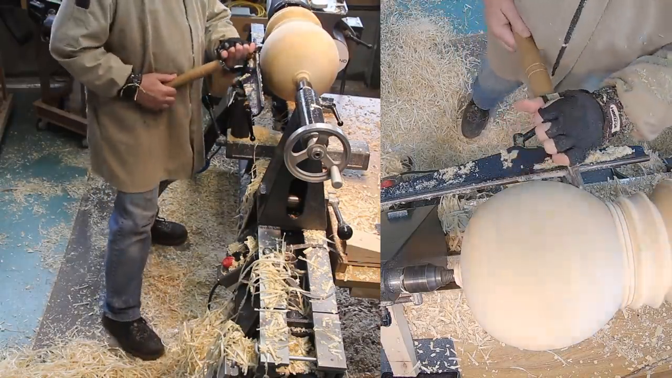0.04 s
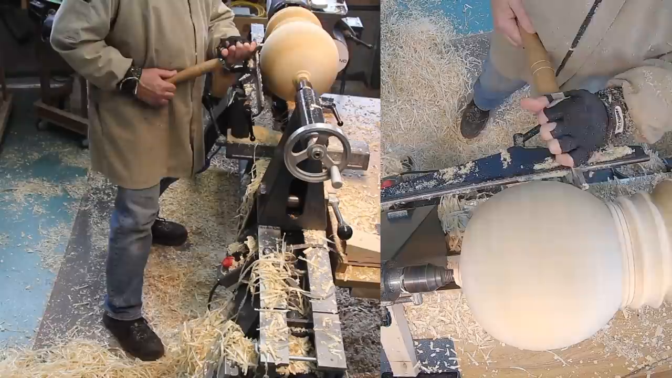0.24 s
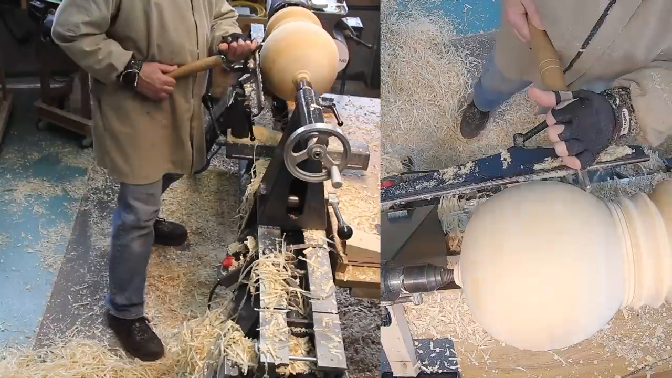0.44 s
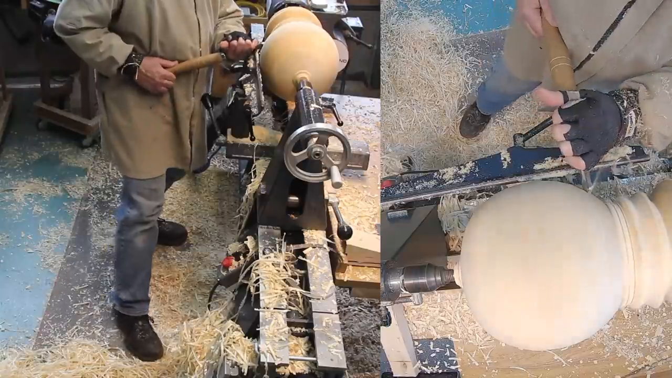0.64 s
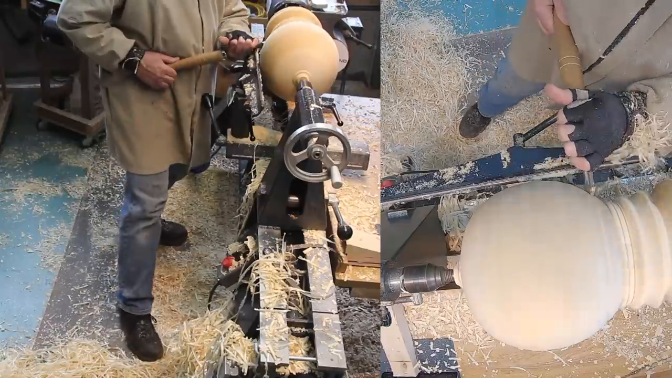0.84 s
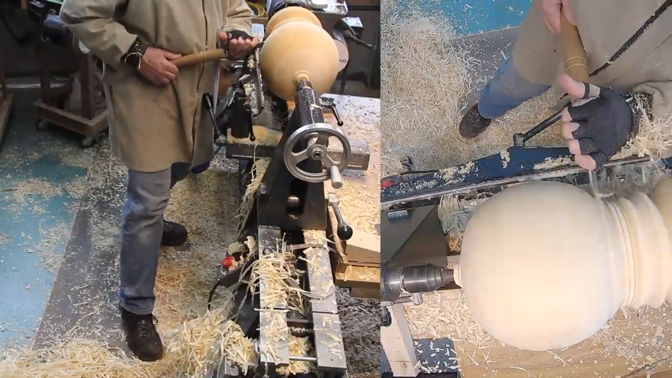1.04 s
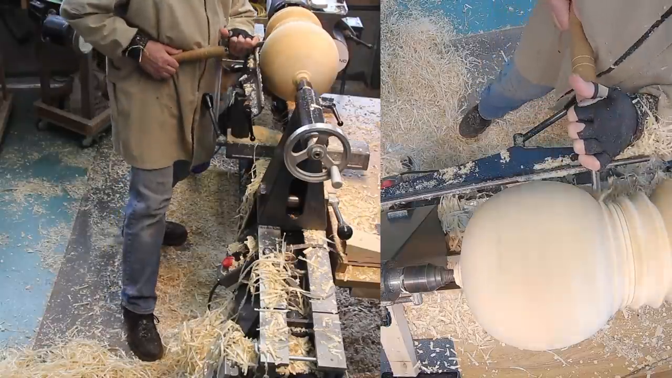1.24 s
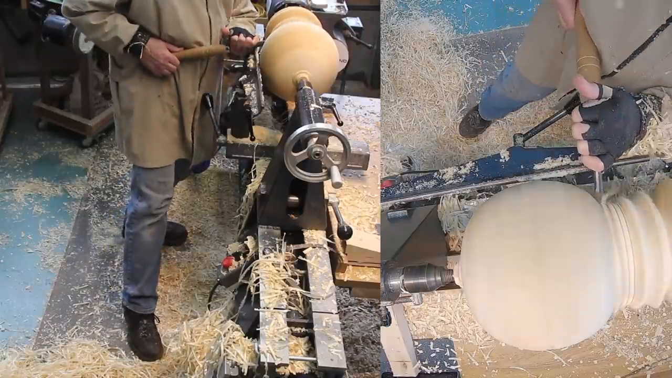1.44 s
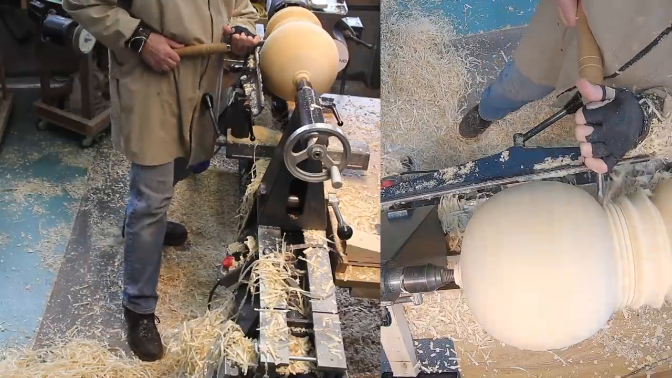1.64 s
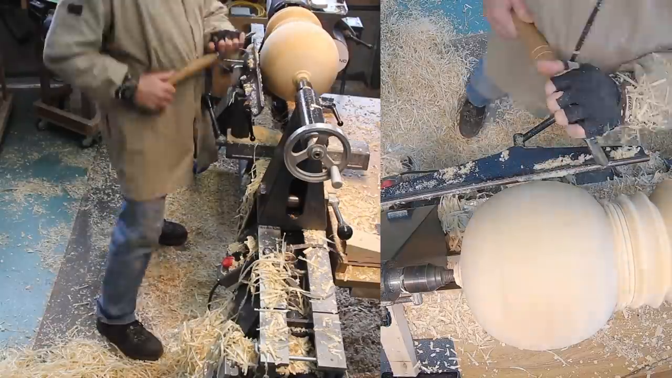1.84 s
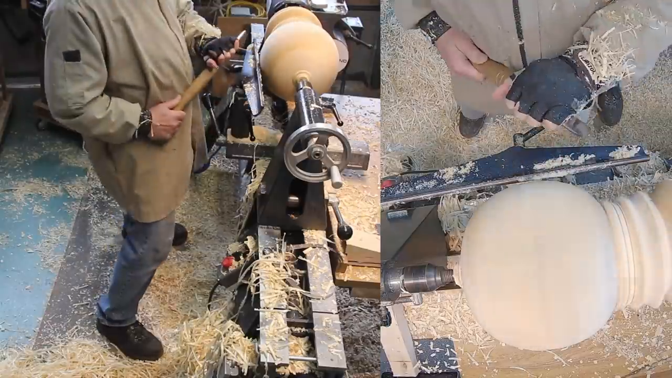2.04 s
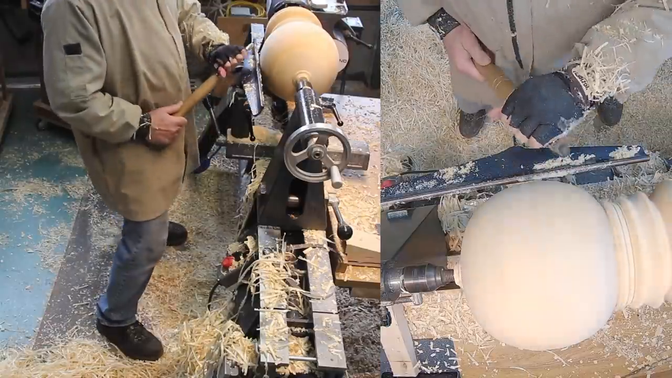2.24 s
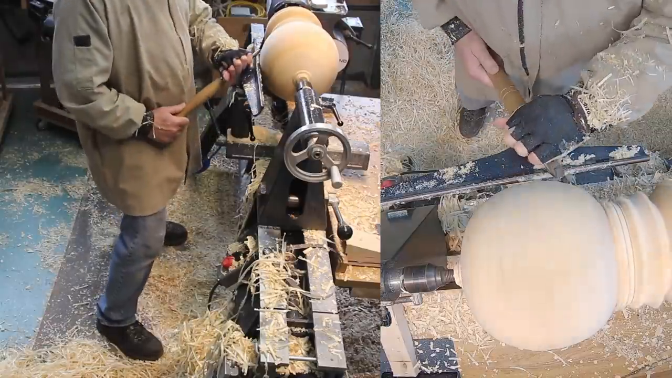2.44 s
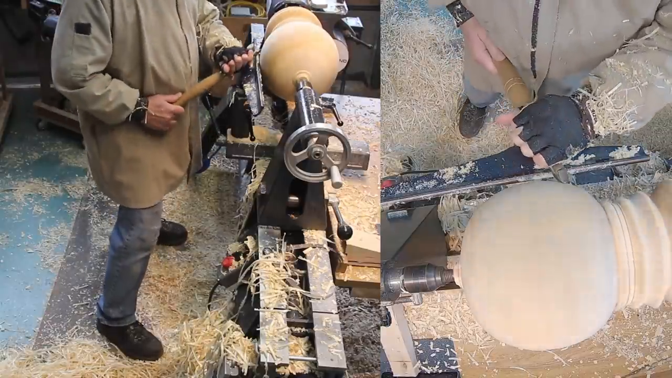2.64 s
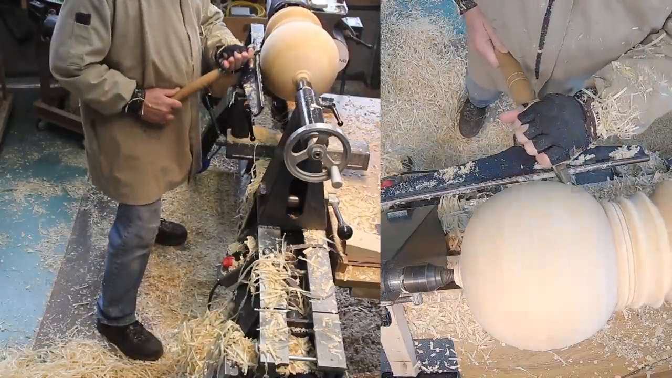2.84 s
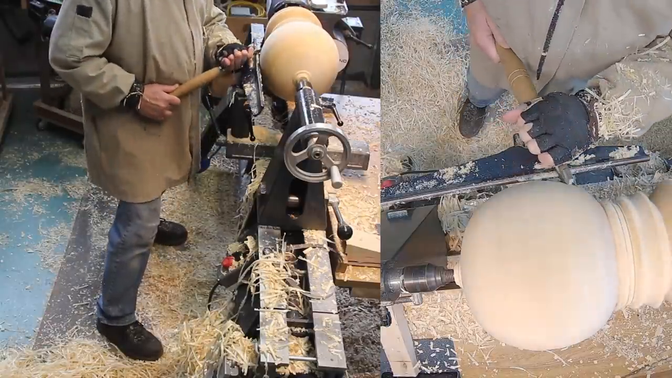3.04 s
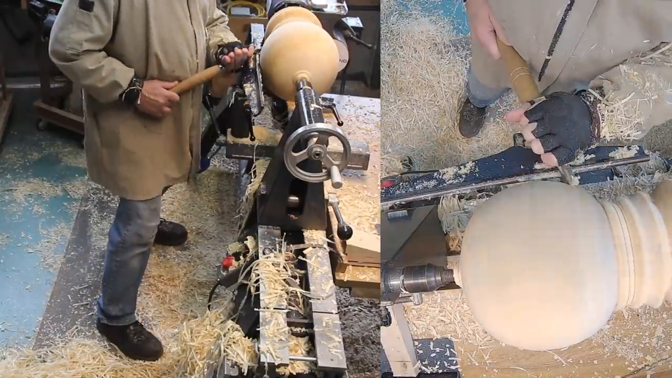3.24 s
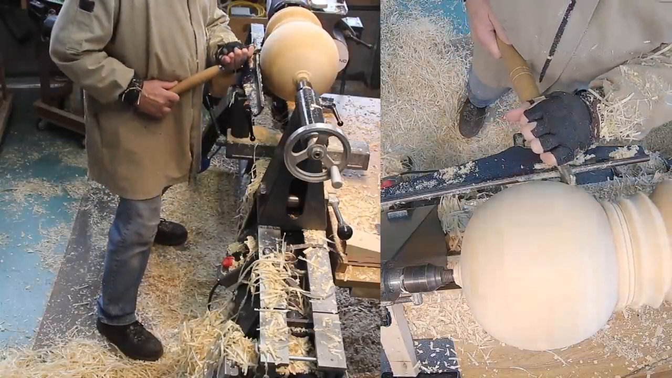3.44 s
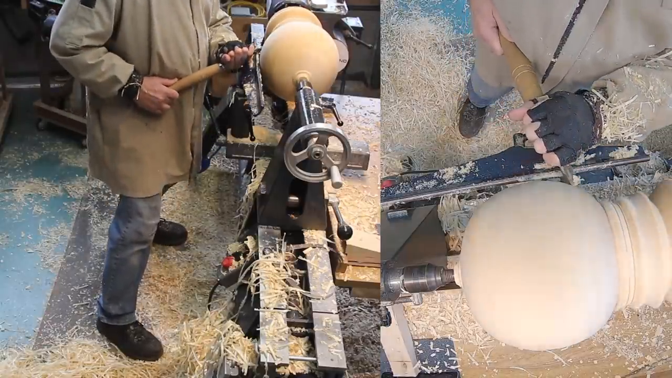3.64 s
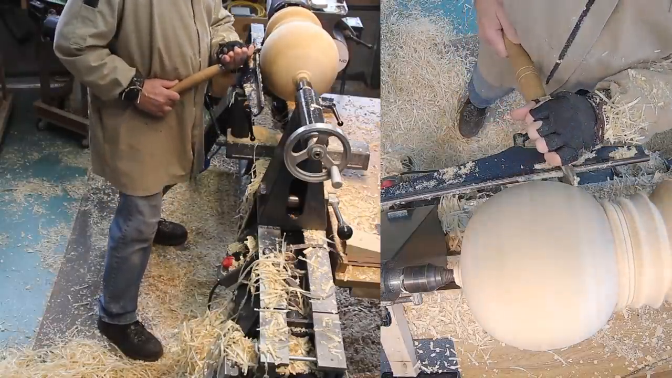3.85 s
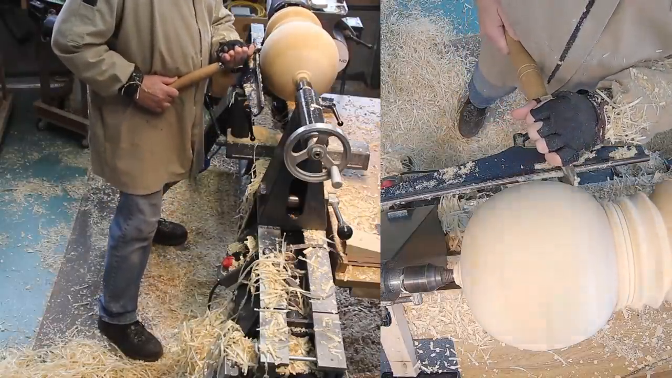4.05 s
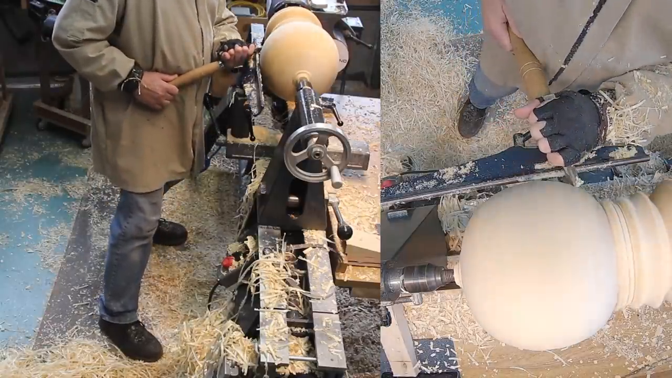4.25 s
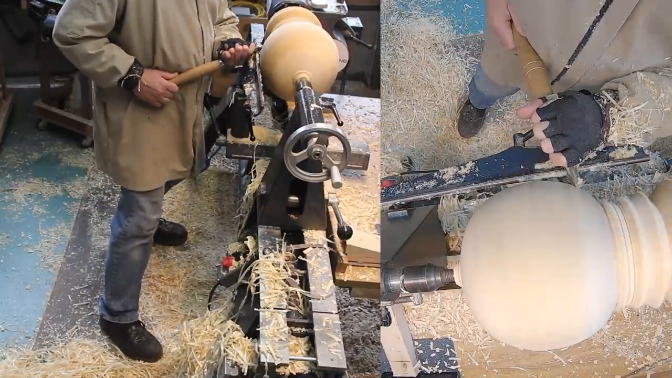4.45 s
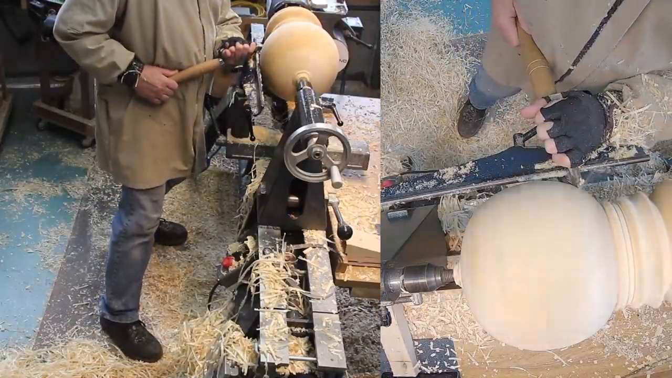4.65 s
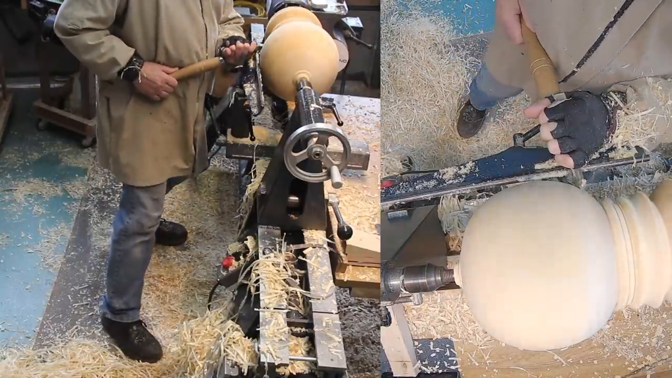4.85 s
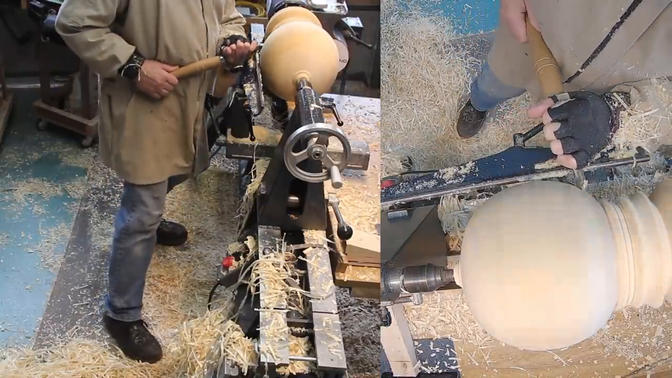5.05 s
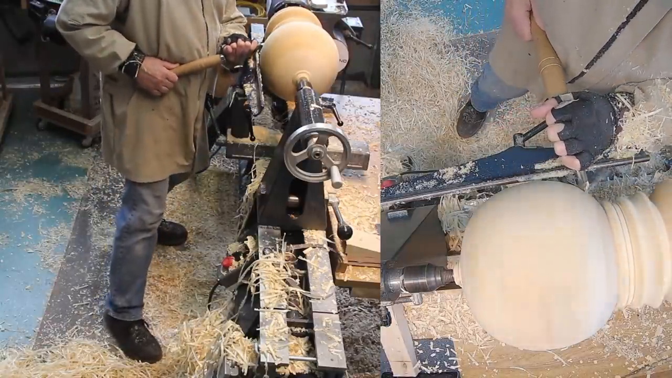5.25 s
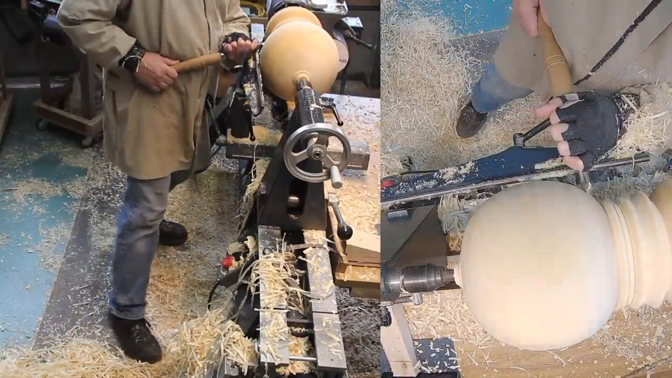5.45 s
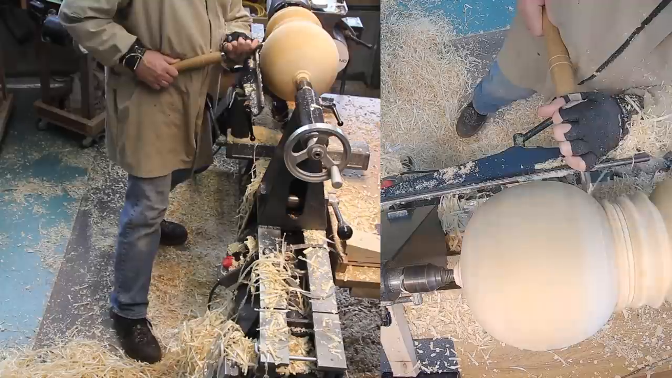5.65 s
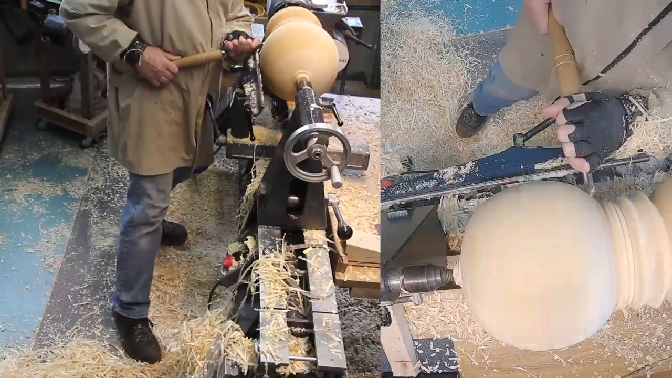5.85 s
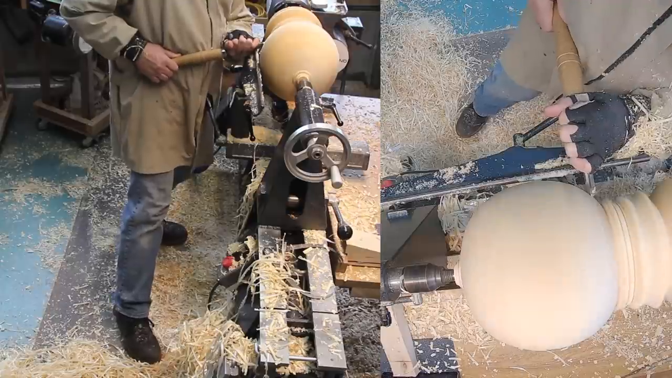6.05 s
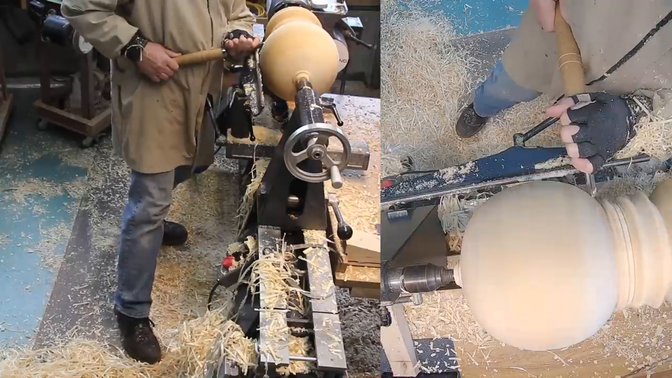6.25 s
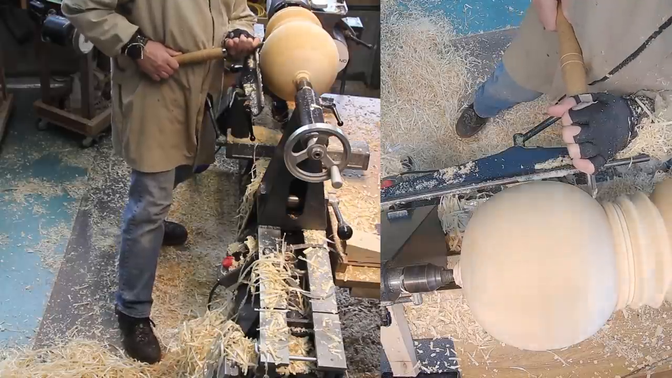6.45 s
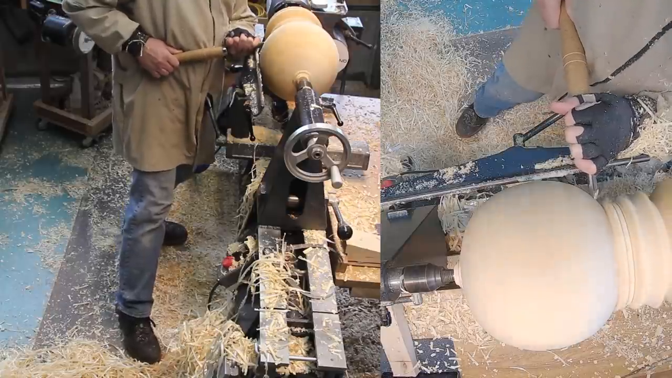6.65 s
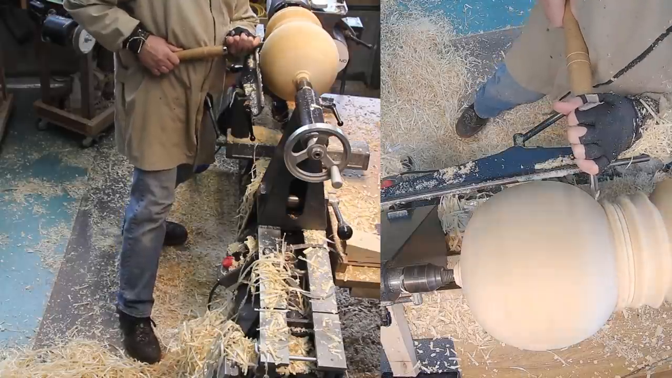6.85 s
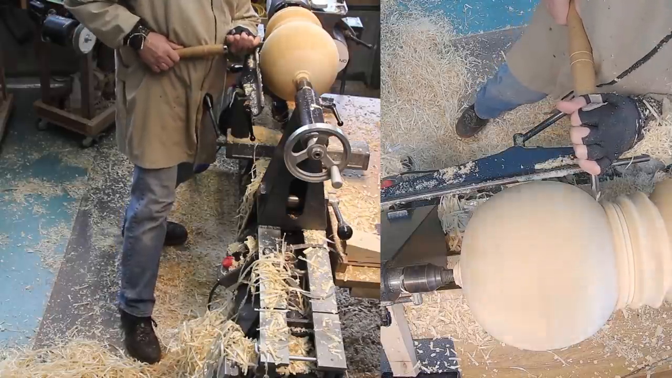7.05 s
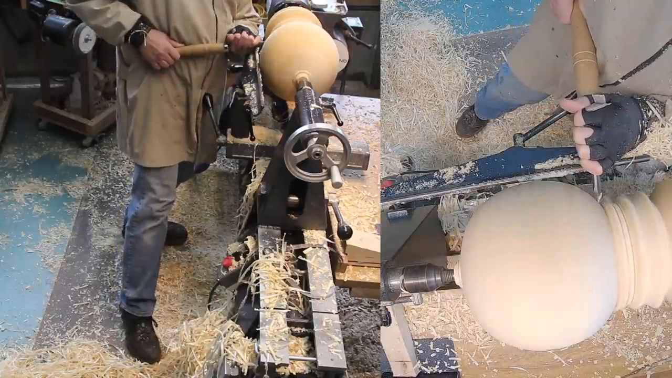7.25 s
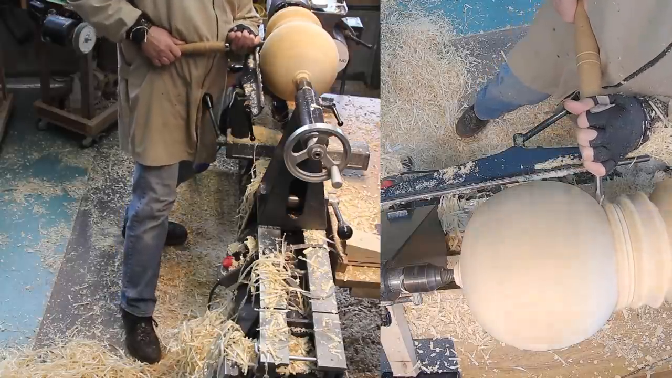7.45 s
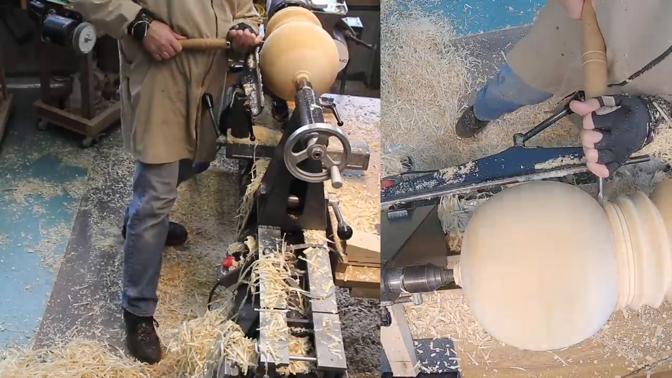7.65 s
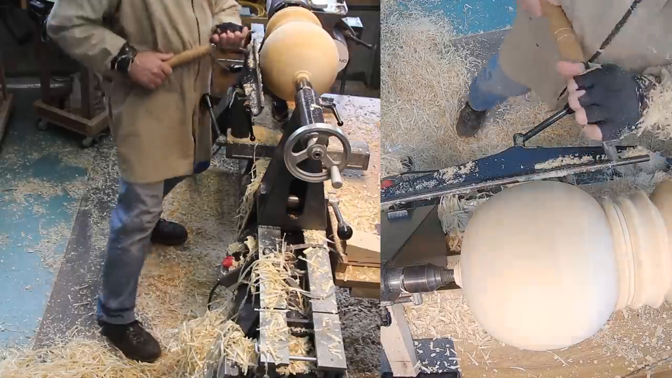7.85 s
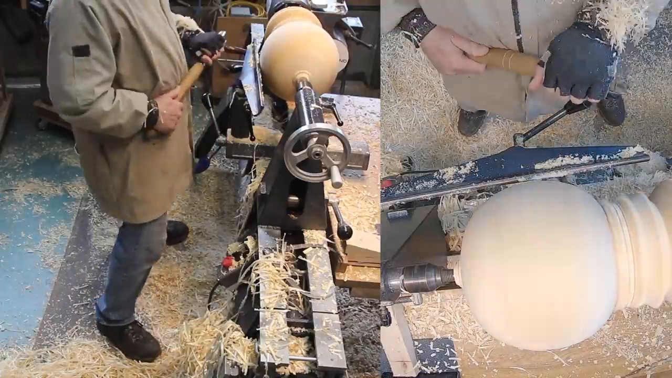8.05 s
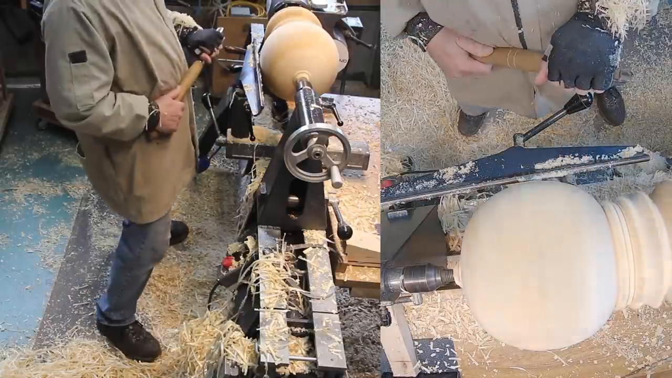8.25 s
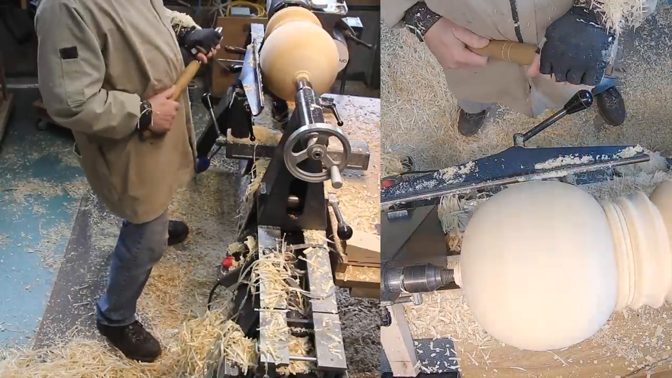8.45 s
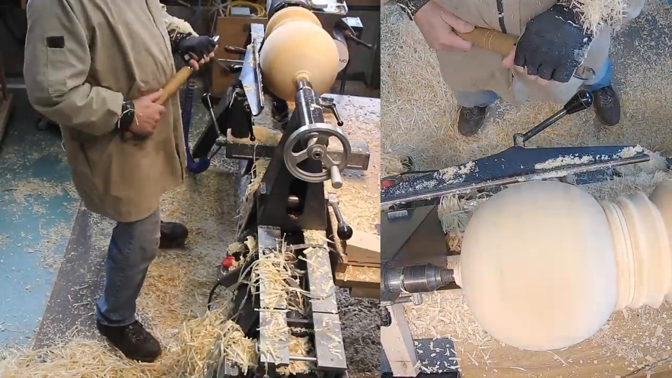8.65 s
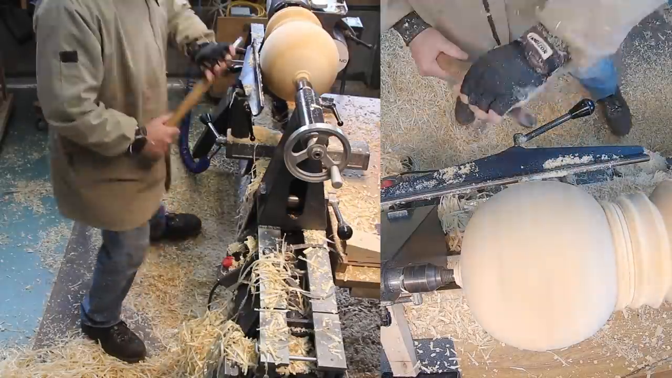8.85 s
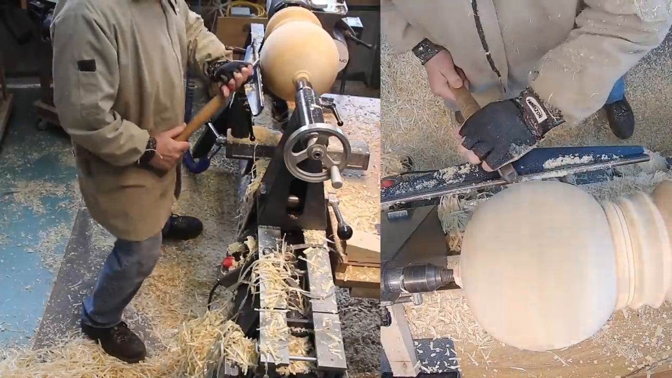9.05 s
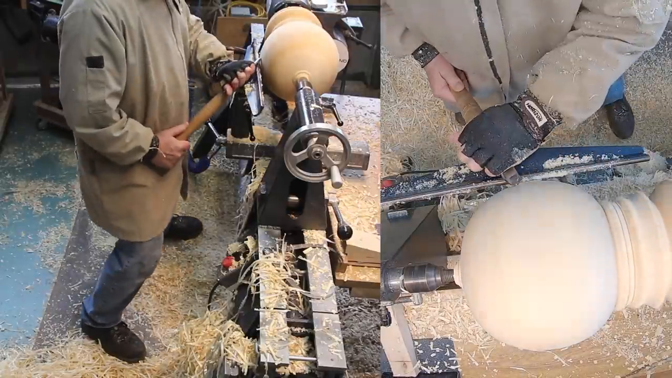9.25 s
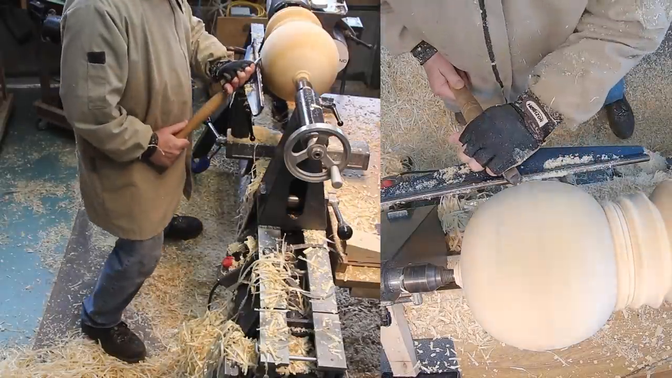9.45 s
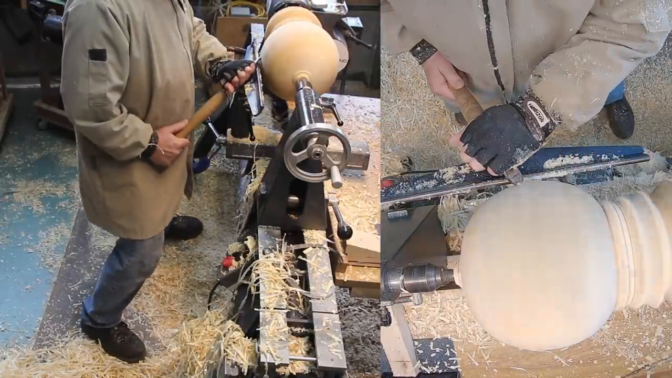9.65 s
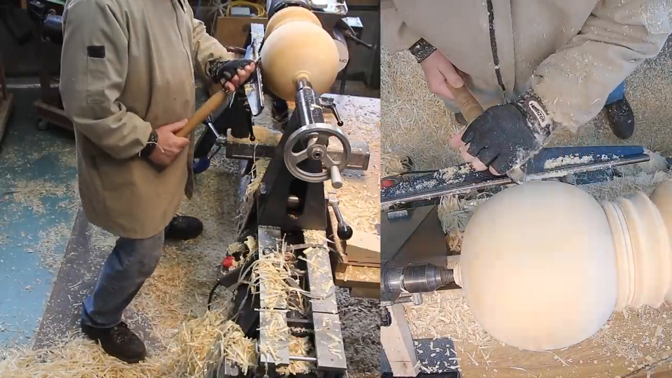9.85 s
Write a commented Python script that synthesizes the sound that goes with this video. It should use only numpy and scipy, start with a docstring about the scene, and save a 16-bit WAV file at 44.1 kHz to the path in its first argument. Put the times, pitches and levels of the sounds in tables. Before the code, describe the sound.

Close to a lathe in a workshop, a gouge tears at spinning wood with a grainy, hissing scrape and a metallic ring, while the machine rumbles at first. After a short pause of quiet whirring, more strokes follow, easing and biting with a few brief squeals. The cutting stops again, the faint idle drops out for an instant, and a sharp, stuttering click and a tiny tick lead into one final pass.

```python
"""A gouge cuts green wood spinning on a workshop lathe, while a low, gusty rumble dies away at first. Tearing
fibres ring the steel tool, its rest and the wood in light and deep strokes that judder, ease and bite. The
lathe idles in a pause; then more strokes follow, some throbbing or squealing. In a second pause the drive
pulses faintly and all sound drops out briefly. The tool clicks on the rest, ticks the wood and makes a last
pass. The click and part of the noise stutter sixty times a second."""
import sys
import numpy as np
from scipy import signal
from scipy.fft import rfft, irfft, next_fast_len
from scipy.io import wavfile
from scipy.ndimage import uniform_filter1d

SR = 44100
rng = np.random.default_rng(int(sys.argv[2]) if len(sys.argv) > 2 else 0)


def wav_out(sig):
    """Save sig, one row per channel (or a flat mono array), as 16-bit PCM at SR to the path in sys.argv[1]."""
    wavfile.write(sys.argv[1], SR, np.round(np.clip(np.atleast_2d(sig).T, -1, 1) * 32767).astype(np.int16))


N = 437031

def gain_of(db):
    """Turn decibels into a number to multiply by."""
    return 10 ** (np.asarray(db) / 20)

def evened(x):
    """Scale a signal to an average strength (RMS) of 1."""
    return x / np.sqrt(np.mean(x ** 2) + 1e-20)

def level_at(points, hz):
    """Read levels between rows of frequency and level."""
    f, db = np.transpose(points)
    return np.interp(np.log(hz + 1), np.log(f + 1), db)

def curve(rows):
    """Join rows of time and value with straight lines."""
    return np.interp(np.arange(N) / SR, *np.transpose(rows))

def add(mix, start, sound):
    """Mix a sound in at a start time in seconds."""
    part = mix[..., round(start * SR):][..., :sound.shape[-1]]
    part += sound[..., :part.shape[-1]]

def hump(t, middle, width):
    """A smooth bump of height 1."""
    return np.exp(-(2 * (t - middle) / width) ** 2)

def wander(n, per_s):
    """A random drift of about 1 either way; a higher per_s moves faster."""
    knots = rng.standard_normal(int(n / SR * 40) + 3)
    smooth = evened(signal.lfilter([1], [1, -np.exp(-per_s / 40)], knots))
    return np.interp(np.arange(n) / SR * 40, np.arange(len(knots)), smooth)

def stuttered(x, repeats_db, every_s=.0166):
    """Play every moment several times in quick succession, once at each level."""
    taps = np.zeros(round(len(repeats_db) * every_s * SR))
    taps[np.round(np.arange(len(repeats_db)) * every_s * SR).astype(int)] = gain_of(repeats_db)
    return signal.oaconvolve(x, taps[None], axes=1)[:, :x.shape[1]]

def grainy_noise(n, spread_db, stutter_share):
    """Uneven, partly stuttering noise in two rows: mid (what left and right share) and side (the rest)."""
    grain = gain_of(spread_db * uniform_filter1d(rng.standard_normal((2, n)), 100) * 10)
    repeating, plain = rng.standard_normal((2, 2, n)) * grain[:, None]
    repeating = stuttered(repeating, repeats_db=[0.5, -5.5, -8.5, -5.5])
    return np.sqrt(stutter_share) * evened(repeating) + np.sqrt(1 - stutter_share) * evened(plain)

def hiss(spectrum, flicker_db, size=N):
    """Flickering noise with the given tone colour."""
    n = next_fast_len(size)
    colour = gain_of(level_at(spectrum, np.fft.rfftfreq(n, 1 / SR)))
    noise = irfft(rfft(grainy_noise(n, spread_db=0.94, stutter_share=0.2)) * colour, n)[:, :size]
    return evened(noise) * gain_of(flicker_db * wander(size, 30))

# The idling lathe, farther off and nearer. Each row: frequency in Hz, relative level in dB.
IDLE_COLOUR = [(60, -70), (130, -13.5), (250, -8.5), (530, -8), (1000, -10), (1300, -14.5), (2600, -22),
               (3400, -23.5), (4500, -32), (10300, -38.5), (11500, -84)]
NEAR_COLOUR = [(88, -47), (150, -23), (349, -8.5), (518, -2), (1010, -5), (1470, -21.5), (2180, -7),
               (2910, -25), (3480, -15.5), (9030, -34), (11000, -44), (14300, -100)]
# How loud the farther sound is. Each row: time in seconds, level in dB.
IDLE_LEVELS = [(0, -50.5), (2, -64.5), (2.7, -68.5), (6, -66.5), (8, -69), (8.9, -72.5), (9.91, -81)]
GAP_START_S, GAP_END_S = 8.855, 8.884  # the dropout

def idling_lathe():
    """The lathe whirs as it runs free, and sounds nearer after the dropout."""
    out = hiss(IDLE_COLOUR, flicker_db=1) * gain_of(curve(IDLE_LEVELS)) * [[1], [.5]]
    near = hiss(NEAR_COLOUR, flicker_db=0.77, size=SR + 4000)
    add(out, GAP_START_S, near * gain_of(-51) * [[1], [.4]])
    return out

# A low, gusty rumble. Each row: frequency in Hz, relative level in dB.
RUMBLE_COLOUR = [(30, -49), (90, -5), (124, -0.5), (183, -7), (230, 1.5), (295, -10.5), (520, -9),
                 (880, -120)]
# How it dies away. Each row: time in seconds, level in dB.
RUMBLE_LEVELS = [(0.0, -47), (.73, -46.5), (1.5, -54), (1.9, -54), (2.2, -60.5), (2.65, -67), (2.88, -58.5),
                 (3.1, -100)]

def low_rumble(size=N // 3):
    """A low, gusty rumble dies away over the first three seconds."""
    rumble = hiss(RUMBLE_COLOUR, flicker_db=4.5, size=size)
    return rumble * gain_of(curve(RUMBLE_LEVELS)[:size]) * [[1], [.15]]

# The cut has six bands, low to high: wood thrum, rest judder, growl, tool ring, hiss and fizz.
# Strokes of the gouge. Each row: start, end and rise time in seconds, ring level going in and coming
# out in dB, deepening in dB, then thrum, judder, growl, hiss and fizz in dB compared with the ring.
STROKES = [(-.05, 0.915, 0.14, -39, -40, 5.5, -14.5, -27, -4.5, -6.5, -15.5),
           (0.858, 1.812, 0.17, -35.5, -35.5, 16, -8.5, -6, 0, -6.5, -9.5),
           (2.777, 3.334, 0.23, -43, -39.5, 14.5, -35, -23, -9.5, -1.5, -7),
           (3.378, 3.793, 0.17, -36, -39, 10, -36, -15, -7, -5, -15),
           (3.94, 4.874, 0.13, -39, -41.5, 22, -34, -18, -6, -5.5, -13.5),
           (4.88, 5.803, 0.12, -38.5, -44, -8.5, -24, -19, -2.5, -12.5, -25),
           (5.815, 6.422, 0.087, -40, -50.5, 3, -25, -18, -6.5, -15.5, -24),
           (6.425, 6.704, 0.1, -54, -61.5, -2, -19, -8.5, -4.5, -10, -16.5),
           (6.704, 7.15, 0.019, -52, -56.5, -4.5, -20, -12.5, 1.5, -11.5, -21),
           (7.145, 7.636, 0.3, -45.5, -59.5, 3.5, -11.5, -10, -5.5, -13.5, -12.5),
           (7.638, 7.794, 0.16, -38.5, -38, 7.5, -1, -17, -1.5, -8, -9.5),
           (9.312, 10.006, 0.076, -40.5, -33.5, -6, -9.5, -7, -4, -7.5, -12)]
# The share of the deepening that each band gets, low to high.
DEEPENING_SHARES = [1.3, 0.64, 0.57, 0.039, -0.37, -0.46]

def stroke(t, start, end, rise, in_db, out_db, deepening_db, *bands_db):
    """Six band strengths as the edge slides in, cuts and lifts off. Deeper means more lows, less fizz."""
    along = np.clip((t - start) / (end - start), 0, 1)
    lift_db = -48.5 * (np.maximum(t - end, 0) / 0.12) ** 0.96
    ring = np.clip((t - start) / rise, 0, 1) * gain_of(in_db + (out_db - in_db) * along + lift_db)
    balance_db = np.array([*bands_db[:3], 0, *bands_db[3:]])[:, None]
    depth_db = deepening_db * (along ** 0.4 - .5)  # most of the change comes early
    return ring * gain_of(balance_db + np.outer(DEEPENING_SHARES, depth_db))

# How wide the cut sounds. Each row: frequency in Hz, side level compared with mid in dB.
STEREO_WIDTH = [(60, -20), (150, 6.5), (380, -20), (950, -5.5), (2380, -11), (5980, -12), (9000, 0.5),
                (15000, -3.5)]

def tearing_fibres(n, hz, uneven):
    """The spectrum of many tiny tears in the wood; in the treble, side partly follows mid."""
    mid, side = rfft(grainy_noise(n, spread_db=2.02 * uneven, stutter_share=0.64))
    alike = 0.4 * np.clip(hz / 8000, 0, 1)
    side = alike * np.exp(0.44j) * mid + np.sqrt(1 - alike ** 2) * side
    return np.array([mid, side * gain_of(level_at(STEREO_WIDTH, hz))])

def ringing(tears, n, hz, rolling, pitch_hz, width_hz, db):
    """The tears keep one note ringing. It swells and fades, and drifts in pitch if the edge rolls."""
    loose = (pitch_hz / 8000) ** 2  # high rings are damped more and swell more
    width_hz += 0.0045 * pitch_hz * (1 + (6.4 + 8 * rolling) * loose)
    spectrum = tears / (1 + 2j * (hz - pitch_hz) / width_hz) ** 2
    if rolling:
        drift_hz = .02 * pitch_hz * rolling * wander(n, 6)
        ring = 2 * (np.fft.ifft(spectrum, n) * np.exp(2j * np.pi * np.cumsum(drift_hz) / SR)).real
    else:
        ring = irfft(spectrum, n)
    quick_db = .6 * wander(n, 30)
    slow_db = (loose + 3.5 * rolling / (1 + loose)) * wander(n, 16)
    return ring * gain_of(db + quick_db + slow_db - 1.5 * loose)

# The borders between the six bands, in Hz.
BAND_BORDERS_HZ = [900, 1300, 2300, 5000, 8500]

def cut(gains, colour, rolling, uneven):
    """Tearing fibres make a scrape and set notes ringing; each band follows its own row of gains."""
    rings, scrape = colour
    size = gains.shape[1]
    n = next_fast_len(size)
    hz = np.fft.rfftfreq(n, 1 / SR)
    tears = tearing_fibres(n, hz, uneven)
    band_of = np.digitize(hz * (1 + 0.13 * rng.standard_normal(len(hz))), BAND_BORDERS_HZ)  # soft edges
    scraping = tears * gain_of(level_at(scrape, hz) - 7)
    bands = np.array([irfft(scraping * (band_of == k), n) for k in range(6)])
    for row in rings:
        bands[np.digitize(row[0], BAND_BORDERS_HZ)] += ringing(tears, n, hz, rolling, *row)
    out = 0
    for band, gain in zip(bands[..., :size], gains):
        steady = band / np.sqrt(uniform_filter1d(band[0] ** 2, 6000) + 1e-12)
        out += steady * gain * gain_of(1.5 * uneven * wander(size, 72))  # the grain catches unevenly
    return out

# Six tone colours of the cut, with two lists each. First the rings. Each row: pitch in Hz, width in Hz,
# relative level in dB. Then the scrape between them. Each row: frequency in Hz, relative level in dB.
LIGHT = ([(1089, 131, 10), (1444, 57, -12.5), (1748, 220, -7.5), (1937, 170, -9.5), (2192, 100, -11.5),
          (2776, 250, 1.5), (3302, 360, 6), (4246, 240, -1), (5614, 100, -11.5), (7040, 1300, -17.5)],
          [(180, -72.5), (300, -13.5), (1080, -4), (2400, -1.5), (3330, 9), (12300, -27.5), (15000, -47)])
DEEP = ([(426, 29, -4), (755, 150, -3.5), (1113, 146, -6), (1417, 320, -7.5), (1762, 300, -6.5),
         (2916, 91, -10.5), (3330, 88, -12.5), (7440, 280, -30)], [(150, -45.5), (250, -10), (411, 10.5),
         (641, 2.5), (3270, -1.5), (8520, -25), (15000, -59)])
SKIM = ([(1109, 61, 16), (1820, 98, 2.5), (2742, 240, 5), (3255, 170, 6), (4650, 170, -14)], [(180, -72),
         (300, -3.5), (3270, -3.5), (3980, -20.5), (9490, -66.5), (15000, -92)])
ROLLED = ([(446, 160, 13.5), (1955, 220, 4.5), (2880, 220, 4.5), (3980, 250, -0.5), (4740, 180, -1),
           (6600, 690, 0.5), (9480, 120, 5)], [(180, -24.5), (300, 2.5), (2820, 5), (8320, -18),
           (9640, -16), (15000, -61.5)])
CATCH = ([(411, 57, -7.5), (1360, 270, -6), (1866, 130, 3), (2880, 150, 11)], [(120, -87.5), (200, -31),
          (440, -4), (720, -18), (2850, 10.5), (9500, -28.5), (15000, -72)])
LAST = ([(524, 39, 3.5), (1090, 160, -9.5), (2570, 80, -13), (2710, 130, -5), (3270, 510, -9.5),
         (3610, 140, -9), (3870, 540, -11.5), (7100, 180, -13), (9260, 360, -30)], [(150, -41), (250, -20),
         (531, -0.5), (1390, -20.5), (2700, -10.5), (7060, -8.5), (15000, -42)])
# How the gouge is held. Each row: start and end in seconds, tone colour, then how much the edge rolls
# and how uneven the cut is, both from 0 to 1.
HOLDS = [(0, .95, LIGHT, 0, 1), (.88, 1.95, DEEP, 0, .5), (2.72, 5.4, LIGHT, 0, 1), (5, 7.32, SKIM, 1, 1),
         (7.08, 7.7, ROLLED, .4, 1), (7.63, 7.95, CATCH, 0, 1), (9.26, 10.0, LAST, 0, .8)]

def gouge(gains):
    """Each way of holding the gouge rings differently; overlapping holds blend into each other."""
    out = np.zeros((2, N))
    overlaps = [this[1] - following[0] for this, following in zip(HOLDS, HOLDS[1:])]
    fades_s = np.maximum([0, *overlaps, 0], .07)
    for k, (start, end, colour, rolling, uneven) in enumerate(HOLDS):
        sound = cut(gains[:, round(start * SR):round(end * SR)], colour, rolling, uneven)
        t = np.arange(sound.shape[1]) / SR
        fade = np.minimum(t / fades_s[k], (end - start - t) / fades_s[k + 1])
        add(out, start, sound * np.sqrt(np.clip(fade, 0, 1)))
    return out

# Rings that come and go. Each row: two times in seconds, the pitch in Hz at each of them, width in Hz,
# boost in dB (a negative one is a dip).
SWIRLS = [(.05, 0.86, 3320, 3340, 310, -5.5), (.05, 0.94, 2480, 2720, 324, 9),
          (4.54, 5.49, 7100, 5700, 650, 8), (4.81, 5.76, 9400, 9600, 463, 7.5),
          (5.54, 6.54, 7430, 7100, 864, 9.5), (6.65, 6.905, 2570, 3240, 300, 7),
          (6.66, 6.4, 3200, 3500, 270, -2.5), (6.906, 7.254, 1950, 2140, 250, 6)]

def turning_edge(sound):
    """Rings slide in pitch as the edge turns, while random patches sink through the treble."""
    hz, t, spectrum = signal.stft(sound, SR, nperseg=512)
    db = np.zeros(spectrum.shape[1:])
    for start, end, from_hz, to_hz, width_hz, boost_db in SWIRLS:
        along = np.clip((t - start) / (end - start), 0, 1)
        swell = np.sqrt(np.sin(np.pi * along).clip(0))
        db += boost_db * swell * hump(hz[:, None], from_hz + (to_hz - from_hz) * along, width_hz)
    patches = rng.standard_normal((len(t), len(hz))).T
    patches = evened(uniform_filter1d(uniform_filter1d(patches, size=4, axis=0), size=10, axis=1))
    sinking = (np.arange(len(hz))[:, None] + np.arange(len(t)) // 8) % len(hz)
    patch_db = np.interp(t, [4.3, 5.3, 7.6, 7.7], [1.5, 4.5, 4.5, 1.5])
    treble = np.clip(hz / 5000, 0, 1)[:, None] ** 2
    db += patch_db * np.take_along_axis(patches, sinking, 0) * treble
    return signal.istft(spectrum * gain_of(db), SR, nperseg=512)[1][:, :N]

# Bursts of juddering. Each row: middle in seconds, level in dB, width in seconds.
JUDDERS = [(.155, -45.5, 0.1), (.277, -41, 0.054), (.57, -45, 0.057), (.71, -40, 0.089), (3.77, -44, 0.023),
           (4.117, -40, 0.026), (4.236, -39.5, 0.017), (4.31, -49, 0.14), (4.465, -40, 0.025),
           (4.515, -45, 0.048), (4.76, -50, 0.053), (6.206, -53.5, 0.03), (6.32, -58, 0.085)]

def judders(t):
    """The strength added as the tool rest shakes in short bursts."""
    return sum(gain_of(db) * hump(t, middle, width) for middle, db, width in JUDDERS)

# Moments of lighter pressure. Each row: middle in seconds, dip in dB, width in seconds.
EASES = [(.335, -2.5, 0.11), (3.604, -4, 0.097), (4.575, -7, 0.041), (6.253, -12, 0.031), (6.376, -3, .015),
         (6.06, -5.5, 0.17), (6.172, -18, 0.055), (7.615, -20, 0.029)]

def eases_db(t):
    """The cut gets quieter when the hand eases."""
    return sum(db * hump(t, middle, width) for middle, db, width in EASES)

# Sudden bites. Each row: start in seconds, level in dB, length in seconds, extra growl in dB.
BITES = [(0.92, -40.5, 0.11, -31), (2.814, -56, 0.033, -23), (3.953, -57, 0.081, -6),
         (4.156, -43.5, 0.077, 2), (5.444, -45.5, 0.067, -2), (5.588, -49, 0.02, -13),
         (6.096, -53, 0.07, 10.5), (6.191, -50.5, 0.062, 5.5), (6.258, -57, 0.023, -20),
         (6.381, -52.5, 0.029, 0), (6.561, -60, 0.046, 10.5), (6.706, -75, 0.063, -7),
         (6.86, -61, 0.049, -11), (7.023, -66.5, 0.038, 18.5), (7.092, -68, 0.028, 14),
         (7.434, -66, 0.17, 11), (7.566, -60.5, 0.13, 12), (7.733, -42.5, 0.067, 6.5)]

def bites(t):
    """The cut dips, then the edge bites a high spot: ring and growl jump, hold and drop."""
    dip, ring, growl = 1, 0, 0
    for start, db, length, growl_db in BITES:
        along = (t - start) / length
        dip *= np.where(along < 0, 1 - 0.3 * np.exp(np.minimum(along, 0) * 3), 1)
        bite = (along >= 0) * gain_of(db) * np.exp(-np.clip(along, 0, 9) ** 3.1)
        ring += bite
        growl += bite * gain_of(growl_db)
    return dip, ring, growl

# Low thumps. Each row: start in seconds, peak level in dB, pitch in Hz.
THUMPS = [(2.031, -44, 204), (2.26, -46, 218), (2.311, -50.5, 113), (2.741, -53, 135), (2.858, -58, 94),
          (4.366, -51, 484), (5.247, -56, 106)]

def thumps(rise_s=0.011):
    """Each thump is a low note that swells quickly and dies away."""
    out, t = np.zeros((2, N)), np.arange(6000) / SR
    swell = t / rise_s * np.exp(1 - t / rise_s)
    for start, db, hz in THUMPS:
        add(out[0], start, gain_of(db) * swell * np.sin(2 * np.pi * hz * t))
    return out

# Spells of throbbing. Each row: first peak and end in seconds, throbs per second, swing in dB.
THROBS = [(4.237, 4.535, 13.5, 3), (4.975, 5.412, 14.52, 2)]

def throbs_db(t):
    """The wood is not quite round, so it throbs against the edge."""
    return sum(db * np.cos(2 * np.pi * per_s * (t - peak)) * (t > peak - .25 / per_s) * (t < end)
               for peak, end, per_s, db in THROBS)

# Squeals. Each row: middle in seconds, level in dB, width in seconds, pitch in Hz.
SQUEALS = [(4.86, -46, 0.12, 1450), (6.44, -59.5, 0.098, 1425), (6.81, -48.5, 0.062, 1474)]

def squeals(waver_hz=25, rough_db=4):
    """The edge gives short, rough squeaks that waver in pitch and strength."""
    t = np.arange(N) / SR
    waver = np.cumsum(waver_hz * wander(N, 26)) / SR
    tone = sum(gain_of(db) * hump(t, middle, width) * np.sin(2 * np.pi * (hz * t + waver))
               for middle, db, width, hz in SQUEALS)
    rough = uniform_filter1d(rng.standard_normal(N), size=400) * 20
    return tone * gain_of(rough_db * rough) * [[1], [.3]]

# The drive's pulses. Each row: first peak, spacing and width in seconds, pitch and band width in Hz,
# level in dB.
DRIVE_PULSES = [(8.05, 0.208, 0.07, 992, 160, -72), (8.05, 0.1, 0.058, 3380, 72, -82)]

def drive(n=40000):
    """The idling drive pulses faintly in narrow bands of noise until the dropout."""
    out, t, hz = np.zeros((2, N)), np.arange(n) / SR, np.fft.rfftfreq(n, 1 / SR)
    for first, every, width, pitch_hz, width_hz, db in DRIVE_PULSES:
        band = irfft(rfft(rng.standard_normal((2, n))) / (1 + (2 * (hz - pitch_hz) / width_hz) ** 4), n)
        pulses = evened(band) * gain_of(db) * hump(t % every, every / 2, width)
        add(out[:, :round(GAP_START_S * SR)], first - every / 2, pulses * [[1], [.5]])
    return out

# How the tool rest rings. Each row: pitch in Hz, relative level in dB, seconds to fade by 60 dB.
REST_RINGS = [(2920, 2.5, 0.016), (3750, 7, .011), (4950, -5, .018), (5900, -12, .012), (7650, -16, 0.033),
              (10000, -18, .03)]
# The knock. Each row: start in seconds, gain in dB.
CLICKS = [(9.049, -28.5)]
# The level of each beat of its stutter, in dB.
CLICK_REPEATS_DB = [0, -2, -9, -17, -25]

def rest_click(n=4096):
    """Steel knocks the tool rest, which rings and rattles; the knock stutters as it fades."""
    out, t, hz = np.zeros((2, N)), np.arange(n) / SR, np.fft.rfftfreq(n, 1 / SR)
    ring = sum(gain_of(db - 60 * t / fade_s) * np.sin(2 * np.pi * (pitch_hz * t + rng.random((2, 1))))
               for pitch_hz, db, fade_s in REST_RINGS)
    colour = np.minimum(hz / 900, 1) ** 2 / (1 + (hz / 5000) ** 4)
    rattle = evened(irfft(rfft(rng.standard_normal((2, n))) * colour))
    fade = 0.56 * gain_of(-60 * t / 0.015) + 0.15 * gain_of(-60 * t / 0.23)
    knock = (ring + rattle * fade) * np.minimum(t / 0.0012, 1) ** 2
    for start, db in CLICKS:
        add(out, start, gain_of(db) * knock * [[1], [.3]])
    return stuttered(out, CLICK_REPEATS_DB)

# The touch before the last pass. Each row: start in seconds, level in dB, pitch in Hz.
TICKS = [(9.2858, -50, 8570)]

def edge_tick(n=4096):
    """The edge just touches the wood, with a tiny burst of high fizz."""
    out, t, hz = np.zeros((2, N)), np.arange(n) / SR, np.fft.rfftfreq(n, 1 / SR)
    for start, db, pitch_hz in TICKS:
        fizz = evened(irfft(rfft(rng.standard_normal((2, n))) / (1 + ((hz - pitch_hz) / 900) ** 4)))
        level = gain_of(db - 60 * t / 0.23) * np.minimum(t / 0.002, 1)
        add(out, start, level * fizz * [[1], [.5]])
    return out

def band_gains(step=32):
    """Combine strokes, judders, eases, bites and throbs into the strength of the cut's six bands."""
    t = np.arange(0, N + step, step) / SR
    gains = sum(stroke(t, *row) for row in STROKES) + 1e-9
    dip, bite_ring, bite_growl = bites(t)
    pressure = gain_of(eases_db(t) + throbs_db(t)) * dip
    ring = pressure + bite_ring / gains[3]
    growl = pressure + bite_growl / gains[3]
    thrum, treble = ring ** 0.73, ring ** 0.59  # these follow the ring only partly
    gains *= [thrum, pressure, growl, ring, treble, treble]
    gains[1:3] += np.outer([1, 0.38], judders(t))  # some judder spills into the growl
    gains = uniform_filter1d(gains, size=2, axis=1)
    return np.array([np.interp(np.arange(N) / SR, t, gain) for gain in gains])

# Where the sound leans. Each row: time in seconds, left level minus right level in dB.
LEAN = [(0.0, -1.5), (4.72, -1), (7.45, 2.5), (8.11, -1.5), (8.75, -4.5), (9.91, -1.5)]

def scene():
    """Mix the gouge and the lathe, then turn mid and side into left and right."""
    low_cut = signal.butter(4, 131, "high", fs=SR, output="sos")  # nothing of the cut sounds below about 130 Hz
    mix = signal.sosfilt(low_cut, turning_edge(gouge(band_gains())))
    mix += idling_lathe()
    add(mix, 0, low_rumble())
    mid, side = mix + thumps() + drive() + rest_click() + edge_tick() + squeals()
    lean = gain_of(curve(LEAN) / 2)
    return np.array([(mid + side) * lean, (mid - side) / lean])

def record(dry, fade_in_s=.075, top_hz=15500):
    """The sound drops out once and fades back in; the highest treble is cut throughout."""
    t = np.arange(N) / SR
    fade_in = np.clip((t - GAP_END_S) / fade_in_s, 0, 1) ** 1.5
    audible = np.where(t < GAP_START_S, 1, fade_in)
    treble_cut = signal.firwin(511, top_hz, window=("kaiser", 9), fs=SR)
    return signal.oaconvolve(dry * audible, treble_cut[None], "same")

dry = scene()
out = record(dry)
wav_out(out)
```